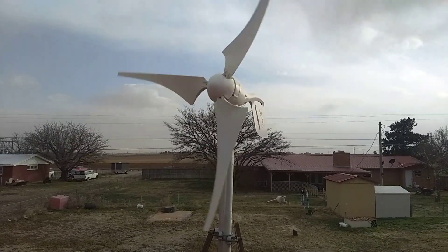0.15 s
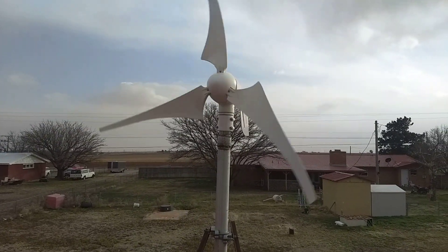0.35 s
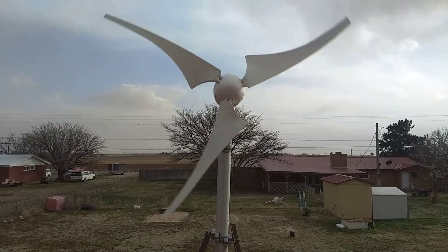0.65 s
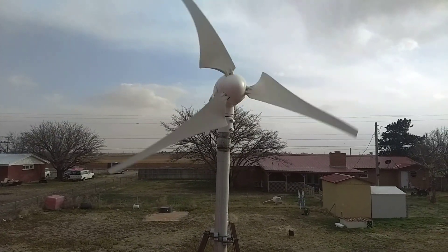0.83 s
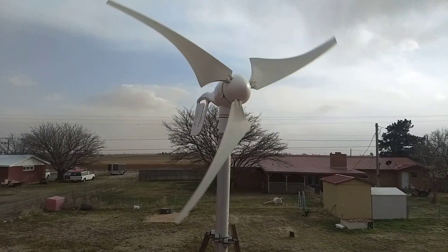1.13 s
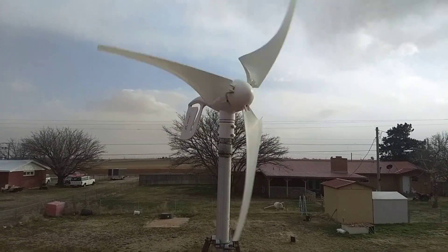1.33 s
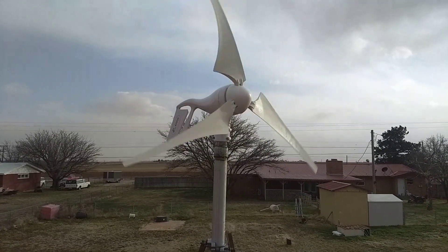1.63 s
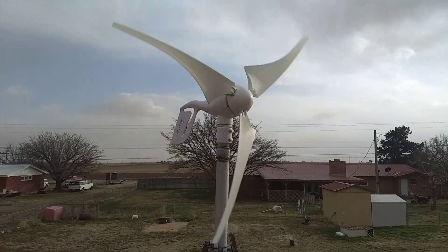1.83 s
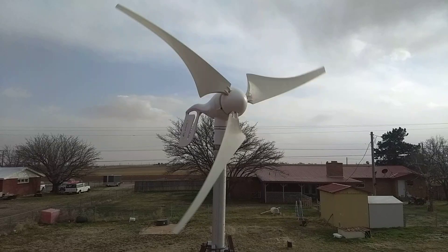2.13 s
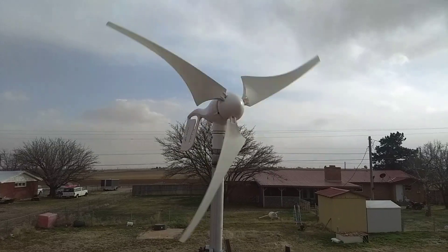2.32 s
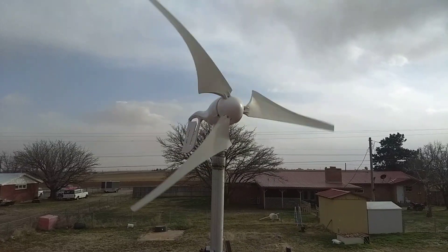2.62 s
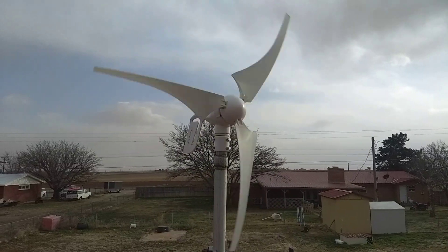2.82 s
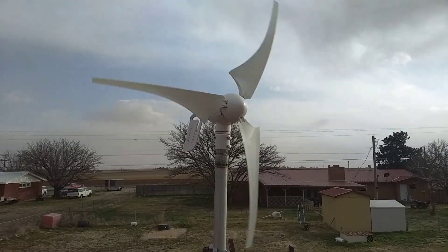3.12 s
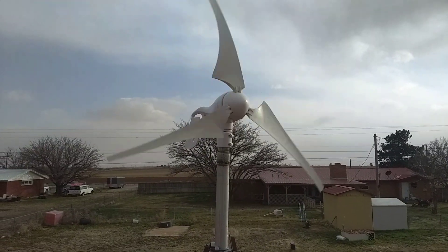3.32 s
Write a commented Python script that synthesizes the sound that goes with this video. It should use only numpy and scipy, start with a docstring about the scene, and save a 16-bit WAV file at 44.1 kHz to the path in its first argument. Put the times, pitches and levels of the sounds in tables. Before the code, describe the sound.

Wind rumbles and thumps roughly on the microphone while a small wind turbine faintly hisses and whistles

```python
"""Gusty wind tumbles over the two capsules of a camera microphone in a yard: rumble, thumps and rough buffets.
The wind is shaped noise and noise bursts, unrelated in each capsule. Turbine and trees add a flickering airy
hiss over a fuzzy low hum; turbine blade tips whistle thinly at each pass, as narrow noise bands, and slow down.
The camera widens its stereo by subtracting each capsule, slightly delayed, from the other."""
import sys
import numpy as np
from scipy import signal
from scipy.fft import rfft, irfft, next_fast_len
from scipy.io import wavfile
from scipy.ndimage import uniform_filter1d

SR = 44100
rng = np.random.default_rng(int(sys.argv[2]) if len(sys.argv) > 2 else 0)


def master(y):
    """Save y as 16-bit WAV."""
    cut = np.clip(np.atleast_2d(y).T, -1, 1)
    pcm = np.round(cut * 32767)  # scale
    wavfile.write(sys.argv[1], SR, pcm.astype(np.int16))


def linear_from_db(decibels):
    """Turn decibels (scalar or array-like) into linear amplitude factors; 0 gives 1."""
    return 10 ** (np.asarray(decibels, float) / 20)


N = 152586


def evened(x):
    """Scales each row to rms 1."""
    return x / np.sqrt(np.mean(x ** 2, -1, keepdims=True) + 1e-20)


def read(points, hz):
    """Reads a spectrum on a log-frequency axis."""
    f, value = np.transpose(points)
    return np.interp(np.log(hz + 1), np.log(f + 1), value)


def curve(table, column):
    """One column of a time table at every sample."""
    table = np.array(table)
    return np.interp(np.arange(N) / SR, table[:, 0], table[:, column])


def coloured(points, count, size):
    """Rows of noise with the given spectrum, each of rms 1."""
    spectrum = rfft(rng.standard_normal((count, size)))
    hz = np.fft.rfftfreq(size, 1 / SR)
    return evened(irfft(spectrum * linear_from_db(read(points, hz)), size))


def smoothed_noise(shape, span):
    """Noise averaged twice over span samples, scaled to rms 1 per row."""
    once = uniform_filter1d(rng.standard_normal(shape), span)
    return evened(uniform_filter1d(once, span))


def fuzzy_tone(hz, pole_width_hz, channels):
    """Noise squeezed by three equal poles into a narrow band that follows the curve hz."""
    slow = rng.standard_normal((channels, N)) + 1j * rng.standard_normal((channels, N))
    r = np.exp(-np.pi * pole_width_hz / SR)
    for _ in range(3):
        slow = signal.lfilter([1 - r], [1, -r], slow)
    carrier = np.exp(2j * np.pi * np.cumsum(hz) / SR)
    return evened((slow * carrier).real)


# airy hiss of turbine and trees, rms within 3-7 kHz; hum and tips ride on it: [start_s, level_db]
HISS_LEVEL = [(0, -49.5), (.045, -49.5), (.07, -55), (.41, -51), (.45, -56.5), (.9, -54.5), (1.2, -51.5),
              (1.55, -48), (1.78, -49.5), (1.85, -64), (2.2, -61.5), (2.5, -56.5), (2.8, -52.5),
              (3.19, -49), (3.23, -52.5), (3.46, -51)]
# hiss spectrum: [pitch_hz, level_db]
HISS_SPECTRUM = [(200, 22.5), (700, 12), (1200, 8), (2000, 4.5), (3500, 1), (6600, -4.5), (7800, -13),
                 (11000, -17), (15500, -16.5)]
HISS_PATCH_DB, HISS_FLICKER_DB = 1.5, 1.3  # rms


def hiss():
    """Broad noise with patches drifting over time and pitch, and a flicker shared by all pitches."""
    noise = coloured(HISS_SPECTRUM, count=2, size=N + 512)
    hz, t, z = signal.stft(noise, SR, nperseg=512, noverlap=384)
    patches = uniform_filter1d(rng.standard_normal(z.shape[1:]), size=8, axis=0)
    patches = uniform_filter1d(patches, size=16, axis=1)
    flicker = uniform_filter1d(rng.standard_normal(len(t)), size=8)
    z = z * linear_from_db(HISS_PATCH_DB * evened(patches) + HISS_FLICKER_DB * evened(flicker))
    band = (hz > 3000) & (hz < 7000)
    band_share = np.sqrt((abs(z[:, band]) ** 2).sum() / (abs(z) ** 2).sum())
    airy = evened(signal.istft(z, nperseg=512, noverlap=384)[1][:, :N])
    return linear_from_db(curve(HISS_LEVEL, column=1)) * airy / band_share


HUM_HZ, HUM_POLE_WIDTH_HZ, HUM_OVER_HISS_DB = 128.4, 34, 20.5


def hum():
    """Fuzzy low hum, alike in both capsules, swelling with the hiss."""
    tone = fuzzy_tone(np.full(N, HUM_HZ), HUM_POLE_WIDTH_HZ, channels=1)
    return tone * linear_from_db(curve(HISS_LEVEL, column=1) + HUM_OVER_HISS_DB)


# first flash of every fifth blade pass, before jitter: [start_s]
FIFTH_PASS_TIMES = [-.23, .05, .329, .619, .9, 1.182, 1.485, 1.803, 2.163, 2.531, 2.895, 3.283, 3.66]
# tip whistles, mid pitch and level over the hiss, before spreads:
# [start_s, upper_pitch_hz, upper_level_db, lower_pitch_hz, lower_level_db]
TIP_WHISTLES = [(0, 13900, -3, 11700, -2.5), (.35, 14100, 2, 12000, -10), (.45, 14500, -7, 11500, -7),
                (.9, 14300, -9, 11800, -7), (.97, 14000, 5, 12400, -15), (1.1, 14000, -12, 12400, -17),
                (1.5, 12700, -8, 11000, -16), (1.75, 12400, -8, 10000, -10),
                (2.6, 13400, -11.5, 9900, -9.5), (3.46, 12700, -9, 10100, -14)]
TIP_POLE_WIDTH_HZ, TIP_LEFT_DB = 1350, -17
TIP_ARCH, PASS_PITCH_SPREAD = .11, .04  # fractions of pitch
PASS_SPREAD_DB, PASS_JITTER_PASSES = 3.5, .08  # rms
FLASH_OFFSET_PASSES, FLASH_WIDTH_PASSES = .11, .05  # flash to mid-pass; bell sigma


def blade_tips():
    """Two thin whistles; each pass flashes twice, rising as the tip nears and falling as it leaves."""
    count = np.arange(len(FIFTH_PASS_TIMES)) * 5
    passes = np.interp(np.arange(N) / SR, FIFTH_PASS_TIMES, count) - FLASH_OFFSET_PASSES
    nearest = np.round(passes).astype(int)
    out = np.zeros((2, N))
    for column in (1, 3):
        near, leave, pitch, late = rng.standard_normal(size=(80, 4))[nearest].T
        away = passes - nearest - PASS_JITTER_PASSES * late
        off = abs(away) - FLASH_OFFSET_PASSES
        flash = np.exp(-.5 * (off / FLASH_WIDTH_PASSES) ** 2)
        flare = linear_from_db(PASS_SPREAD_DB * np.where(away < 0, near, leave)) * flash
        bend = 1 + PASS_PITCH_SPREAD * pitch - TIP_ARCH * np.sin(2 * np.pi * off)
        whistle = fuzzy_tone(curve(TIP_WHISTLES, column) * bend, TIP_POLE_WIDTH_HZ, channels=2)
        out += whistle * flare * linear_from_db(curve(TIP_WHISTLES, column + 1))
    return out * linear_from_db(curve(HISS_LEVEL, column=1)) * linear_from_db([[TIP_LEFT_DB], [0]])


def lumps(seconds):
    """Slow random drift for each capsule, rms 1 before its peaks are capped at 1.5."""
    span = max(round(seconds * SR), 2)
    return np.minimum(smoothed_noise((2, N), span), 1.5)


# turbulence bed, before lumps and dip:
# [start_s, left_rumble_db, left_flutter_db, right_rumble_db, right_flutter_db]
WIND_LEVELS = [(0.02, -16, -30.5, -21.5, -52), (0.22, -20.5, -32, -30, -28.5),
               (0.42, -15.5, -50, -20.5, -38), (0.62, -26.5, -45, -41, -40.5), (0.82, -29, -44, -33, -38),
               (1.03, -25, -55, -29.5, -42.5), (1.23, -18.5, -27, -29, -40), (1.43, -25, -35, -17.5, -36.5),
               (1.63, -26.5, -34.5, -18.5, -37.5), (1.83, -12, -40, -28, -23), (2.03, -21.5, -29, -15, -42),
               (2.23, -25.5, -62, -23, -35.5), (2.43, -24.5, -35.5, -30, -52), (2.64, -25, -40, -26, -60),
               (2.84, -29, -35, -19.5, -41.5), (3.04, -22.5, -39, -20, -39), (3.24, -34, -36, -22.5, -43),
               (3.44, -31, -50, -13.5, -29.5)]
# spectrum of rumble and thumps: [pitch_hz, level_db]
RUMBLE_SPECTRUM = [(20, -37), (35, -12), (55, 4.5), (100, 5.5), (150, 2), (250, -9), (400, -21), (800, -42),
                   (3000, -140)]
# flutter spectrum: [pitch_hz, level_db]
FLUTTER_SPECTRUM = [(120, -11.5), (250, -0.5), (400, -7), (700, -15.5), (1200, -34.5), (2500, -58),
                    (8000, -120)]
RUMBLE_LUMPS_DB, RUMBLE_LUMP_S, FLUTTER_LUMPS_DB, FLUTTER_LUMP_S = 2.5, 0.025, 6.5, 0.012
DIP_S, DIP_SIGMA_S, DIP_DB = 1.919, 0.064, -19  # the level of the bed dips briefly


def turbulence():
    """Lumpy rumble and flutter, a separate stream in each capsule."""
    dip_db = DIP_DB * np.exp(-.5 * ((np.arange(N) / SR - DIP_S) / DIP_SIGMA_S) ** 2)
    rumble_db = np.array([curve(WIND_LEVELS, column=1), curve(WIND_LEVELS, column=3)])
    rumble_db = rumble_db + RUMBLE_LUMPS_DB * lumps(RUMBLE_LUMP_S)
    flutter_db = np.array([curve(WIND_LEVELS, column=2), curve(WIND_LEVELS, column=4)])
    flutter_db = flutter_db + FLUTTER_LUMPS_DB * lumps(FLUTTER_LUMP_S)
    rumble = coloured(RUMBLE_SPECTRUM, count=2, size=N)
    flutter = coloured(FLUTTER_SPECTRUM, count=2, size=N)
    return linear_from_db(dip_db) * (linear_from_db(rumble_db) * rumble + linear_from_db(flutter_db) * flutter)


def eddies(table, noise, spread, squareness):
    """Each eddy is a burst of pressure on one capsule, its energy set by level and length."""
    size = noise.shape[1]
    out = np.zeros((2, N + 2 * size))
    t = (np.arange(size) - size // 2) / SR
    for (centre_s, capsule, length_s, level_db, *_), row in zip(table, noise):
        bell = np.exp(-.5 * abs(t / (spread * length_s)) ** squareness)
        burst = bell * row
        start = round(centre_s * SR) + size // 2
        gain = linear_from_db(level_db) * np.linalg.norm(bell) / np.linalg.norm(burst)
        out[round(capsule), start:start + size] += gain * burst
    return out[:, size:size + N]


# low thumps of large eddies, capsule 0 left 1 right: [centre_s, capsule, length_s, level_db]
THUMP_EDDIES = [(0.053, 1, 0.0087, -7.5), (0.197, 1, 0.024, -15), (0.34, 1, 0.056, -18),
                (0.434, 1, 0.016, -5.5), (0.613, 1, 0.029, -15), (0.714, 1, 0.013, -7),
                (0.728, 1, 0.02, -6.5), (0.796, 1, 0.054, -11.5), (1.174, 0, 0.015, -10.5),
                (1.379, 0, 0.096, -20.5), (1.508, 1, 0.022, -7.5), (1.634, 1, 0.036, -11),
                (1.704, 0, 0.083, -11.5), (1.758, 1, 0.024, -8), (1.824, 1, 0.05, -9.5),
                (2.09, 1, 0.037, -16), (2.152, 1, 0.042, -13), (2.738, 0, 0.016, -8),
                (2.859, 1, 0.042, -15), (3.172, 1, 0.016, -6.5), (3.209, 1, 0.061, -11),
                (3.377, 1, 0.041, -18), (3.455, 1, 0.009, -6.5)]
THUMP_SPREAD, THUMP_SQUARENESS = 0.29, 2.56  # bell width over length; steepness of its shoulders


def thumps():
    """Large eddies press on a capsule as bursts of rumble."""
    noise = coloured(RUMBLE_SPECTRUM, count=len(THUMP_EDDIES), size=8192)
    return eddies(THUMP_EDDIES, noise, THUMP_SPREAD, THUMP_SQUARENESS)


# rough buffets of small eddies, capsule 0 left 1 right, edge level over body level:
# [centre_s, capsule, length_s, body_level_db, edge_over_body_db]
BUFFET_EDDIES = [(0.049, 1, 0.0098, -8, -19), (0.054, 0, 0.0085, -12, -28), (0.176, 0, 0.012, -25, -19),
                 (0.189, 1, 0.033, -22, -17), (0.315, 1, 0.026, -22.5, -16), (0.43, 1, 0.0053, -9.5, -10),
                 (0.477, 1, 0.026, -16.5, -18), (0.603, 1, 0.012, -25.5, -29),
                 (0.727, 1, 0.018, -17, -16.5), (0.777, 1, 0.021, -23, -12.5),
                 (0.794, 1, 0.015, -12, -11.5), (1.239, 0, 0.07, -18, -18), (1.298, 0, 0.017, -17.5, -14.5),
                 (1.339, 0, 0.0069, -17.5, -26), (1.386, 0, 0.028, -18.5, -19.5),
                 (1.803, 1, 0.0096, -12, -2), (1.823, 1, 0.04, -17.5, -4), (1.864, 1, 0.016, -23.5, -12),
                 (2.03, 1, 0.034, -16, -16), (2.072, 1, 0.012, -13, -14.5), (2.093, 1, 0.034, -17, -5.5),
                 (2.121, 1, 0.055, -16, -10), (2.154, 1, 0.015, -9.5, -16), (2.204, 1, 0.016, -14.5, -12),
                 (2.23, 1, 0.036, -20.5, -14.5), (2.731, 0, 0.011, -16, -23.5), (1.993, 1, 0.013, -30, -11),
                 (3.204, 1, 0.012, -8, -17.5), (3.214, 1, 0.0063, -20, -9), (3.242, 1, 0.0066, -14.5, -25),
                 (3.433, 0, 0.015, -24, -38)]
# buffet body spectrum: [pitch_hz, level_db]
BODY_SPECTRUM = [(100, -25), (200, 8), (350, 6), (600, -2.5), (900, -15.5), (1500, -59), (8000, -120)]
# bright edge spectrum, before crackle: [pitch_hz, level_db]
EDGE_SPECTRUM = [(400, -25), (850, 6.5), (1400, -7), (2200, -14), (4000, -28), (7000, -45), (16000, -62)]
BUFFET_SPREAD, BUFFET_SQUARENESS = 0.26, 1.85  # bell width over length; steepness of its shoulders
CRACKLE_DB, CRACKLE_S = 5.5, 0.0011  # rms swing; grain


def buffets():
    """Small eddies strike a capsule as a burst of body noise plus a crackling bright edge."""
    count = len(BUFFET_EDDIES)
    body_noise = coloured(BODY_SPECTRUM, count, size=8192)
    body = eddies(BUFFET_EDDIES, body_noise, BUFFET_SPREAD, BUFFET_SQUARENESS)
    bright = [(centre_s, capsule, length_s, body_db + edge_db)
              for centre_s, capsule, length_s, body_db, edge_db in BUFFET_EDDIES]
    edge_noise = coloured(EDGE_SPECTRUM, count, size=8192)
    grain = smoothed_noise(edge_noise.shape, max(round(CRACKLE_S * SR), 2))
    crackle = edge_noise * linear_from_db(CRACKLE_DB * grain)
    return body + eddies(bright, crackle, BUFFET_SPREAD, BUFFET_SQUARENESS)


def scene():
    """Pressure at the left and right capsule."""
    return hiss() + hum() + blade_tips() + turbulence() + thumps() + buffets()


# cross-subtraction; the delay spans 0, 1, 2, .. whole cycles at successive rows: [pitch_hz, subtracted_db]
CROSS_FEED = [(0, -1.8), (2345, -2.2), (4650, -2), (6900, -1.8), (9200, -3), (11850, -5.5), (14300, -7.5),
              (16700, -5)]
# the left channel is a little duller: [pitch_hz, level_db]
LEFT_DULLING = [(8000, 0), (13000, -1.6)]
LOW_CUT_HZ, BAND_LIMIT_HZ, CEILING = 36, 15770, 1.02


def widen(z, hz):
    """Subtracts the other capsule's spectrum, delayed, from each; dulls the left."""
    at_hz, cross_db = np.transpose(CROSS_FEED)
    cycles = np.interp(hz, at_hz, np.arange(len(at_hz)))
    delayed = z[::-1] * np.exp(-2j * np.pi * cycles)
    wide = z - delayed * linear_from_db(np.interp(hz, at_hz, cross_db))
    wide[0] *= linear_from_db(read(LEFT_DULLING, hz))
    return wide


def soft_ceiling(x):
    """Bends peaks smoothly so that none passes CEILING."""
    x = x / CEILING
    x8 = ((x * x) ** 2) ** 2
    return CEILING * x / np.sqrt(np.sqrt(np.sqrt(1 + x8)))


def band_limit(x):
    """A steep low-pass at the top of the band."""
    return signal.sosfilt(signal.butter(12, 16420, fs=SR, output="sos"), x)


def record(dry):
    """Camera: stereo widening, low cut, band limit, soft ceiling."""
    size = next_fast_len(N + 512)
    hz = np.fft.rfftfreq(size, 1 / SR)
    wide = widen(rfft(dry, size), hz)
    low_cut = 1 / np.sqrt(1 + (LOW_CUT_HZ / (hz + 1)) ** 8)
    mix = irfft(wide * (hz < BAND_LIMIT_HZ) * low_cut, size)[:, :N]
    return band_limit(soft_ceiling(mix))


dry = scene()
out = record(dry)
master(out)
```